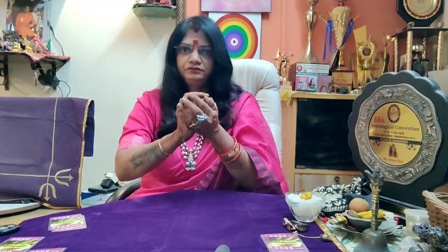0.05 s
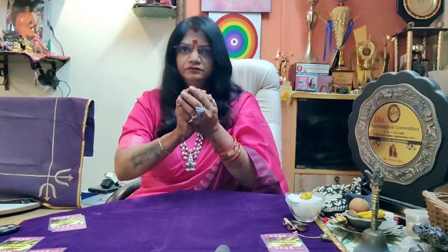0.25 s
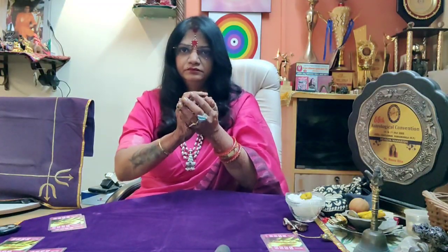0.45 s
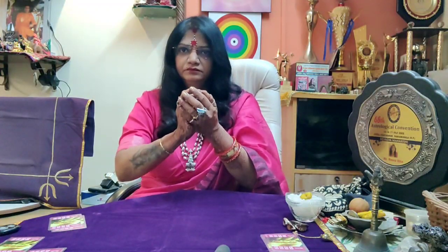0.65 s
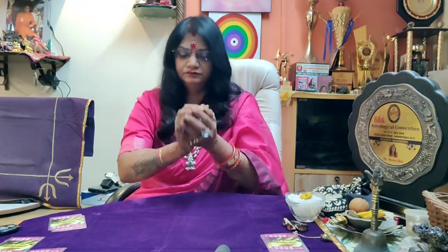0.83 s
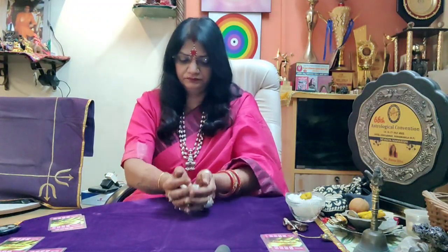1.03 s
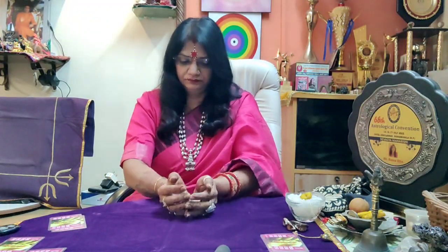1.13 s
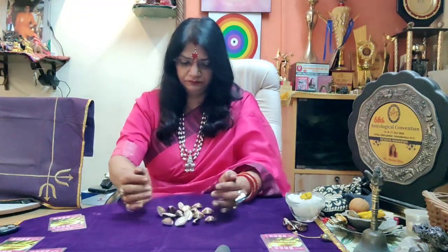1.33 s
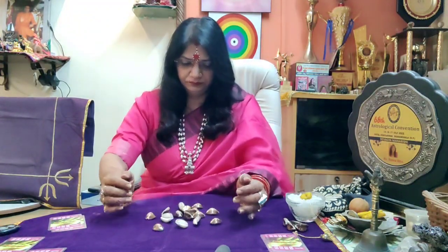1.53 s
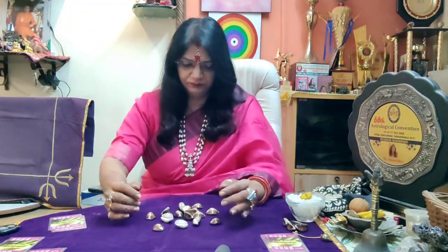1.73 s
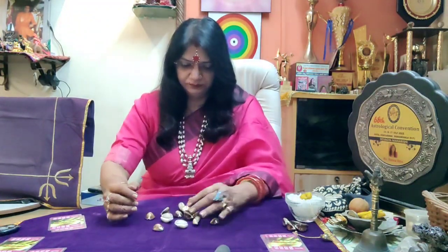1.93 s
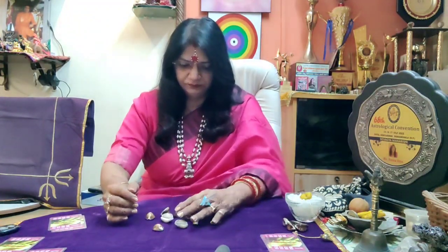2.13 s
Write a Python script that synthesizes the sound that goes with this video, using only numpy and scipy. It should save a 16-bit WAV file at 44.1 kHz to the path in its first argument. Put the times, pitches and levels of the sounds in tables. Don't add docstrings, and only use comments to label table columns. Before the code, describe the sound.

Small hard shells rattle in cupped hands, then spill with dull knocks onto a cloth-covered table

```python
import sys
import numpy as np
from scipy import signal
from scipy.fft import rfft, irfft
from scipy.io import wavfile
from scipy.ndimage import uniform_filter1d

SR = 44100
rng = np.random.default_rng(int(sys.argv[2]) if len(sys.argv) > 2 else 0)


def attenuation_scalar(level_db):
    decades = np.asarray(level_db, float) / 20
    return 10 ** decades


def int16_out(signal):
    q = np.round(np.clip(np.atleast_2d(signal).T, -1, 1) * 32767)
    wavfile.write(sys.argv[1], SR, q.astype(np.int16))


N = 96005


def read(points, hz):
    f, value = np.transpose(points)
    return np.interp(np.log(hz + 1), np.log(f + 1), value)


def evened(x):
    return x / np.sqrt(np.mean(x ** 2) + 1e-20)


def ring(hz, db, t60, size, sign):
    t = np.arange(size)[:, None] / SR
    decay = attenuation_scalar(db - 60 * t / np.maximum(t60, .002))
    return (sign * decay * np.sin(2 * np.pi * hz * t)).sum(1)


def resonate(x, hz, width_hz):
    return signal.lfilter(*signal.iirpeak(hz, hz / width_hz, SR), x)


def split(x):
    low = signal.filtfilt(*signal.butter(2, 4900, fs=SR), x)
    return low, x - low


# peak_s, level_db, rise_s and fall_s (each per 10 dB), hollow_db (low tone against clatter)
HAND_JOLTS = [(.008, -29, 0.06, 0.017, 6.5), (0.072, -26, 0.074, 0.026, -2.5), (0.137, -30, .03, 0.021, 2),
              (.196, -26.5, 0.042, 0.0361, -0.5), (0.284, -29, 0.035, 0.0097, 2),
              (0.338, -25, 0.04, 0.04, -5), (0.409, -32, 0.0704, 0.0468, 1.5),
              (0.466, -25.5, 0.019, 0.028, -4.5), (.53, -31.5, 0.09, 0.1, -2.5), (.6, -29, .015, 0.039, -5),
              (0.659, -33.5, 0.084, 0.15, 0.5), (0.722, -27.5, 0.0023, 0.0444, 0.5),
              (0.794, -33, 0.056, 0.039, 2), (.87, -31, 0.0736, .04, -4), (0.931, -33, 0.09, 0.067, 2.5),
              (1.062, -31.5, 0.048, 0.071, 1), (1.109, -32.5, 0.061, 0.017, 1),
              (1.224, -39.5, 0.024, 0.046, 8), (1.294, -33.5, 0.029, 0.022, -2.5),
              (1.323, -35, 0.0034, 0.0056, 7.5), (1.354, -25.5, 0.019, .012, -0.5),
              (1.368, -26.5, .005, 0.009, 0.5), (1.411, -36, .02, 0.015, -7.5),
              (1.445, -53, 0.022, 0.06, 5.5)]


def effort():
    t = np.arange(N) / SR
    power = []
    for peak_s, level_db, rise_s, fall_s, _ in HAND_JOLTS:
        away = np.where(t < peak_s, (peak_s - t) / rise_s, (t - peak_s) / fall_s)
        power.append(attenuation_scalar(level_db - 10 * away) ** 2 + 1e-30)
    power = np.array(power)
    total = power.sum(0)
    hollow_db = np.transpose(HAND_JOLTS)[4] @ power / total
    return np.sqrt(total), attenuation_scalar(hollow_db)


# pitch_hz, level_db, t60_s, spread_share (detuning between shells)
SHELL_MODES = [(2512, -9, 0.0095, 0.05), (2998, -14.5, 0.0099, .07), (3687, -22, 0.029, .06),
               (5817, -4, 0.0065, 0.05), (6982, 1.5, 0.0051, 0.01), (7580, -3.5, 0.0041, 0),
               (8954, -5.5, 0.0051, .07), (10000, -18, .005, .05), (11900, -8.5, .004, .05),
               (14200, -25, .004, .06)]


def shells(count, ring_share, contact_s, tick_db):
    hz, db, t60, spread = np.transpose(SHELL_MODES)
    size, tick_s = 1024, 0.0013
    t = np.arange(size) / SR
    draw = rng.uniform(-1, 1, (count, 3, len(hz)))
    walls = np.array([ring(hz * (1 + 1.69 * spread * detune), db + 6 * mix, ring_share * t60, size, np.sign(side))
                      for detune, mix, side in draw])
    grit = np.diff(rng.standard_normal((count, size + 1))) * attenuation_scalar(tick_db) * np.exp(-t / tick_s)
    return (walls + grit) * (1 - np.exp(-t / contact_s))


CUP = 1516, 120, 29.5
PALM = 1950, 300, 21
FINGER_GAPS = 4887, 700, 14.5


def hollows(hits):
    squeeze = attenuation_scalar(4 * evened(uniform_filter1d(rng.standard_normal((3, N)), size=1500)))
    return [attenuation_scalar(db) * resonate(resonate(hits * wander, hz, width_hz), hz, 2 * width_hz)
            for (hz, width_hz, db), wander in zip([CUP, PALM, FINGER_GAPS], squeeze)]


# start_s, level_db (peak)
SHARP_CLACKS = [(.0525, -20), (.0762, -18), (.134, -21), (.181, -21), (.3102, -21), (.35, -19), (.453, -20),
                (.48, -20), (.5845, -21), (.605, -14.5), (.61, -15.5), (.623, -20), (.7198, -16),
                (.7213, -17), (.7285, -17), (.73, -16), (.80, -21), (1.0715, -21), (1.1059, -22),
                (1.2146, -30), (1.29, -27), (1.3228, -22), (1.3546, -14.5), (1.3565, -18), (1.361, -18),
                (1.3698, -17), (1.5414, -35), (1.55, -45)]


def rattle():
    clacks = shells(count=64, ring_share=1, contact_s=0.00015, tick_db=-11)
    sharp = shells(count=len(SHARP_CLACKS), ring_share=.6, contact_s=.0005, tick_db=-16)
    push, tone = effort()

    clacks_per_s, size_db, rattle_db = 2200, 2.8, -1
    hits = attenuation_scalar(size_db * np.minimum(rng.exponential(1, N), 3)) * (rng.random(N) < clacks_per_s / SR)
    hits *= rng.choice([-1., 1.], N)
    hits *= attenuation_scalar(rattle_db) * push / np.sqrt(np.mean(hits ** 2) * np.mean((clacks ** 2).sum(1)))
    who = rng.integers(0, len(clacks), N)
    low, high = split(sum(signal.oaconvolve(hits * (who == k), c)[:N] for k, c in enumerate(clacks)))

    single = np.zeros(N)
    for (start_s, level_db), clack in zip(SHARP_CLACKS, sharp):
        single[round(start_s * SR):][:len(clack)] += attenuation_scalar(level_db) * clack / abs(clack).max()
    single_low, single_high = split(single)

    opened = np.clip((np.arange(N) / SR - 0.89) / .04, 0, 1)
    knock = signal.lfilter([1, -1], [1], hits) * attenuation_scalar(-4.5 * opened)
    cup, palm, gap = hollows(knock)
    hollow = low + attenuation_scalar(-8.5 * opened) * cup + palm
    return high + gap + single_high + tone * hollow + attenuation_scalar(-4) * single_low


# pitch_hz, level_db (per Hz)
HUM_SPECTRUM = [(60, 4.5), (350, -2), (1200, -17), (1700, -15.5), (3400, -50), (7400, -36), (8300, -55.5),
                (13000, -57)]


def hum():
    z = rfft(rng.standard_normal(N)) * attenuation_scalar(read(HUM_SPECTRUM, np.fft.rfftfreq(N, 1 / SR)))
    drone = evened(resonate(rng.standard_normal(N), hz=57, width_hz=24))
    return attenuation_scalar(-61) * evened(irfft(z, N)) + attenuation_scalar(-63.5) * drone


# pitch_hz, t60_s
ROOM_DECAY = [(150, 0.71), (1000, 0.83), (3000, 0.373), (7000, 0.41), (14000, 0.24)]


def room(x, count=3):
    out = np.zeros(N)
    at = np.arange(160, SR // 2 - 20, 20)
    turns_per_s = 5
    for k in range(count):
        taps = np.zeros(SR // 2)
        taps[at + rng.integers(0, 20, len(at))] = rng.choice([-1., 1.], len(at))
        hz, t, z = signal.stft(taps, SR, nperseg=256)
        decay = attenuation_scalar(-60 * t / read(ROOM_DECAY, hz)[:, None])
        tail = signal.istft(z * decay, SR, nperseg=256)[1]
        turn = np.sqrt(2 / count) * np.cos(np.pi * (np.arange(N) / SR * turns_per_s + k / count))
        out += signal.fftconvolve(x * turn, tail / np.linalg.norm(tail))[:N]
    return out


# start_s, length_s, level_db
SLIDES = [
    (0.682, 0.16, -52.5),
    (1.205, 0.048, -44),
    (1.277, .2, -48),
]


def rubs():
    t = np.arange(N) / SR
    grain = rng.standard_normal(N) * attenuation_scalar(5.2 * evened(uniform_filter1d(rng.standard_normal(N), size=300)))
    band = evened(signal.lfilter(*signal.butter(2, [400, 1367], "band", fs=SR), grain))
    level = np.zeros(N)
    for start_s, length_s, level_db in SLIDES:
        fade = np.clip((start_s + length_s - t) / 0.11, 0, 1)
        level += attenuation_scalar(level_db) * np.clip((t - start_s) / 0.013, 0, 1) * fade
    return band * level


# start_s, level_db
CLOTH_LANDINGS = [(1.276, -34.5), (1.30, -32.5), (1.325, -26.5), (1.338, -25), (1.353, -26.5), (1.368, -26),
                  (1.385, -28.5), (1.40, -33), (1.421, -33), (1.448, -36.5), (1.472, -53)]
# pitch_hz, level_db, t60_s
TABLE_MODES = [(123.5, -5.5, 0.13), (215.9, -2.5, 0.098), (293, 1.5, 0.057), (400, -3, 0.026),
               (617, -9, 0.055), (830, -5.5, 0.023), (1117, -13, 0.0093), (1587.5, -5.5, 0.019),
               (2807, 0, 0.0068), (3003, -0.5, .015), (3390, -1, 0.023)]


def landings():
    hz, db, t60 = np.transpose(TABLE_MODES)
    size, soft_s = 8192, 0.0012
    out = np.zeros(N + size)
    draw = rng.uniform(-1.3, 1, (len(CLOTH_LANDINGS), 3, len(hz)))
    rise = 1 - np.exp(-np.arange(size) / SR / soft_s)
    for (start_s, level_db), (detune, mix, side) in zip(CLOTH_LANDINGS, draw):
        knock = ring(hz * (1 + 0.071 * detune), db + 4 * mix + level_db - 5, t60, size, np.sign(side))
        out[round(start_s * SR):][:size] += rise * knock
    return out[:N]


GATE_OPEN_DB = 10.5


def gate(x):
    window_s, at_db, knee_db, sinks_s = 0.038, -42.5, 1, 0.2
    level_db = 10 * np.log10(abs(uniform_filter1d(x ** 2, round(window_s * SR))) + 1e-12)
    share = 1 / (1 + np.exp((at_db - level_db) / knee_db))
    keep = np.exp(-1 / (sinks_s * SR))
    slow = signal.lfilter([1 - keep], [1, -keep], share, zi=[keep])[0]
    return attenuation_scalar(GATE_OPEN_DB * (0.62 * share + 0.44 * slow - 1))


def scene():
    near = rattle() + rubs() + landings()
    room_db = -4.5
    heard = (near + attenuation_scalar(room_db) * room(near)) / np.sqrt(1 + attenuation_scalar(2 * room_db))
    return (heard + attenuation_scalar(GATE_OPEN_DB) * hum())[None]


# pitch_hz, level_db
MIC_COLOUR = [(28, -18), (55, -7), (1000, 1), (4300, 5), (7600, 1.5), (7900, 3), (8150, 3), (15000, -4)]


def microphone(x):
    x = np.pad(x, [(0, 0), (2048, 2048)], "reflect")
    hz = np.fft.rfftfreq(x.shape[1], 1 / SR)
    colour = attenuation_scalar(read(MIC_COLOUR, hz)) * (hz < 15720)
    return irfft(rfft(x) * colour, x.shape[1])[:, 2048:-2048]


def low_pass(x):
    return signal.sosfilt(signal.butter(12, 15710, fs=SR, output="sos"), x)


def record(dry):
    mix = microphone(dry * gate(dry[0]))
    return low_pass(mix)


dry = scene()
out = record(dry)
int16_out(out)
```